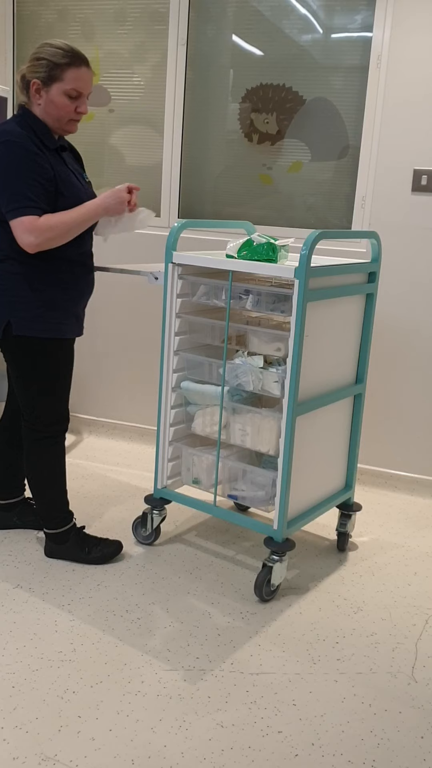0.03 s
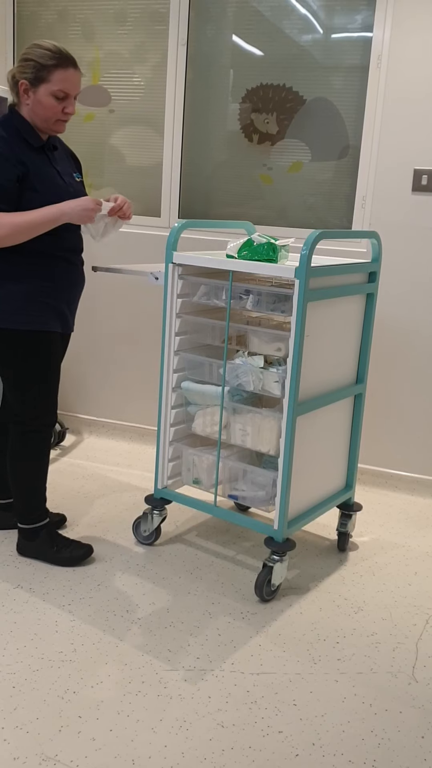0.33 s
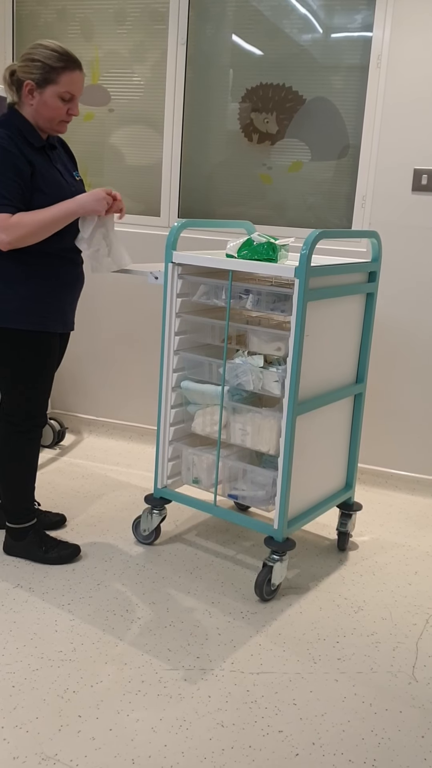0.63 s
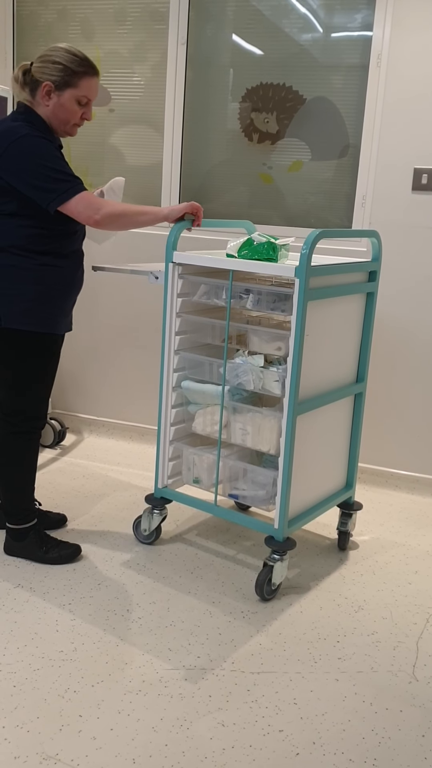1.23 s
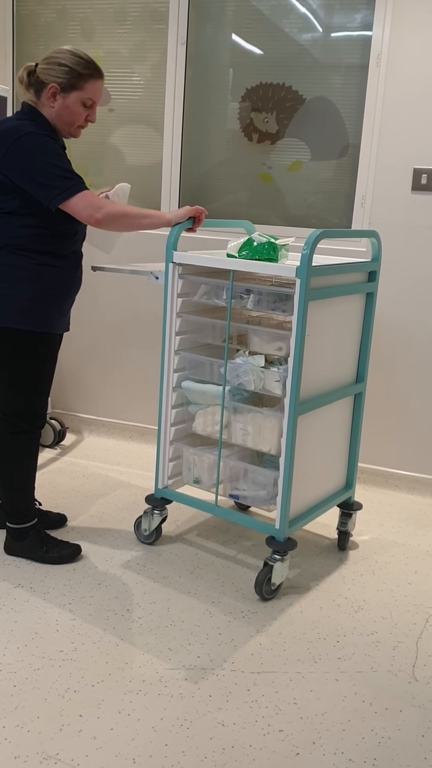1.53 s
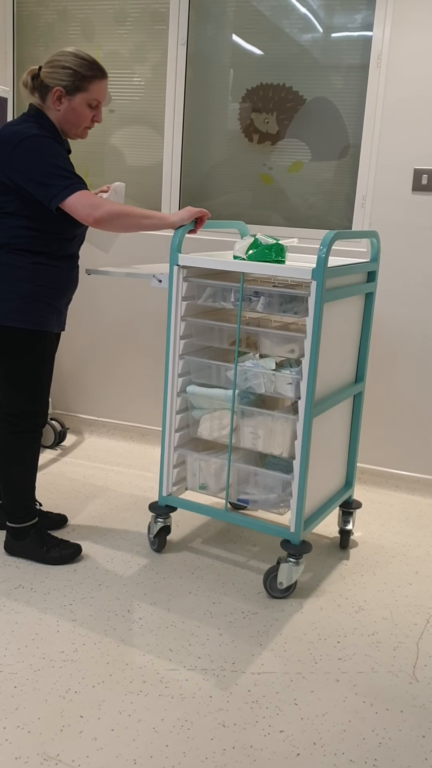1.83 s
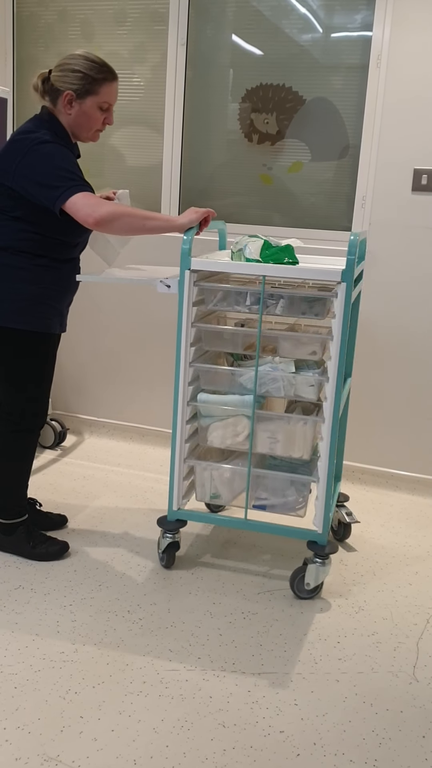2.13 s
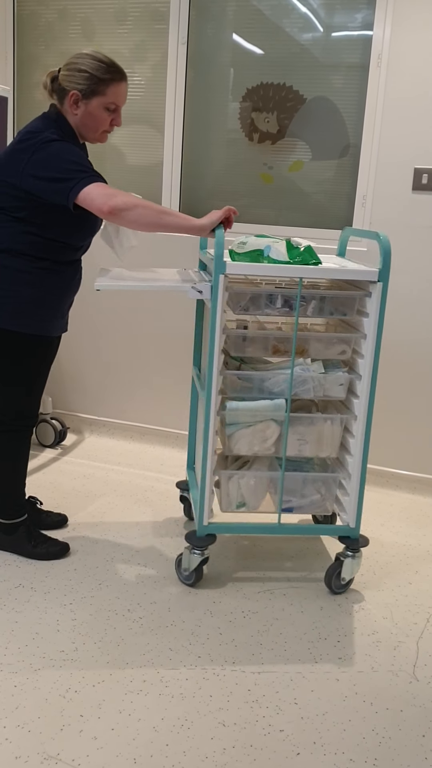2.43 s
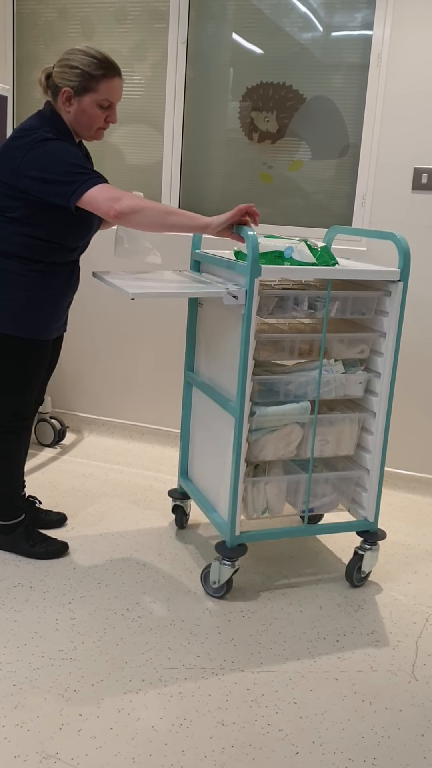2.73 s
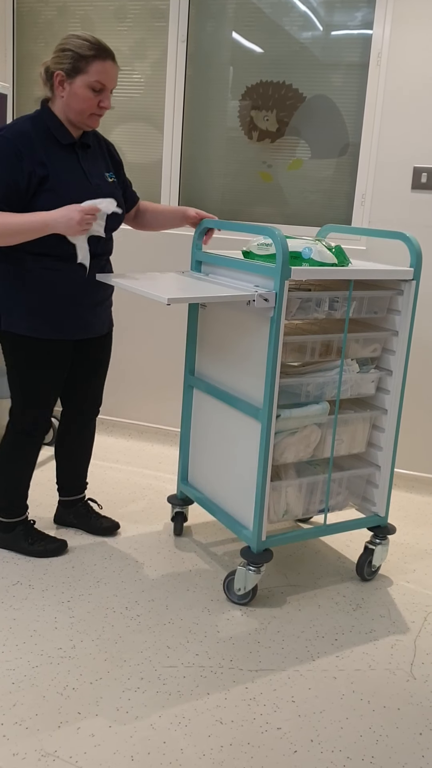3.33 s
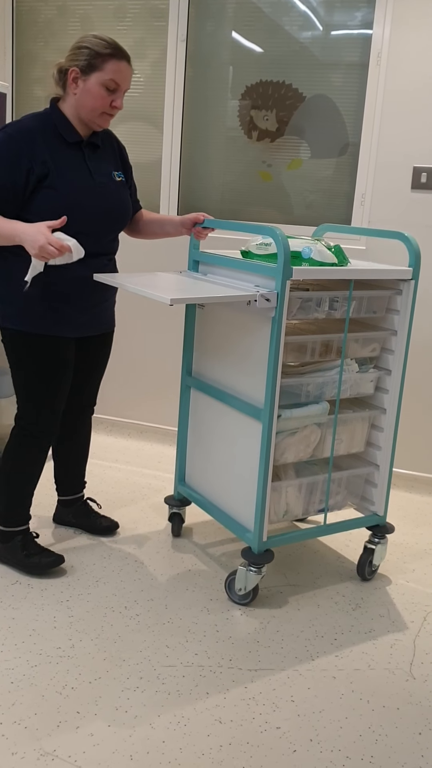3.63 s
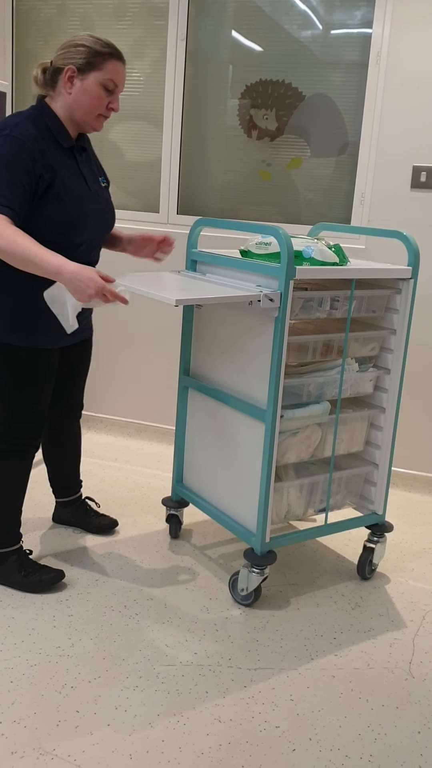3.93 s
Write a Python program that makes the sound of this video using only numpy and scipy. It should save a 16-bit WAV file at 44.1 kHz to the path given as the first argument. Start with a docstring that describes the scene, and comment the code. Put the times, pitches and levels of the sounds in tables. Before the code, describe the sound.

A wet wipe rustles softly, then a trolley swings round, its plastic drawers knocking and rattling.

```python
"""In a hard-walled clinical room, the ventilation rumbles and clothes rustle as a wet wipe is pulled
through the hands, its damp fibres hissing and ticking. A drawer trolley is then swung round on its
castors: the wheels roll and bump, the frame knocks and rings, plastic trays rattle and a loose metal
fitting jingles. The wipe is gathered up again and a rubber sole scuffs the floor.
The walls add a short echo to each movement."""
import sys
import numpy as np
from scipy import signal
from scipy.fft import rfft, irfft
from scipy.io import wavfile
from scipy.ndimage import uniform_filter1d

SR = 44100
rng = np.random.default_rng(int(sys.argv[2]) if len(sys.argv) > 2 else 0)


def generate_wav(signal):
    """Clip the signal to [-1, 1] and save it as 16-bit WAV at the path in sys.argv[1]."""
    frames = np.transpose(np.atleast_2d(signal))
    scaled = np.clip(frames, -1, 1) * 32767
    pcm = np.round(scaled).astype(np.int16)
    wavfile.write(sys.argv[1], SR, pcm)


N = 176400
T = np.arange(N) / SR

# Tone of the moving air: (frequency [Hz], relative level [dB])
AIR_TONE = [(15, -17), (27, 6), (40, -2), (66, 1), (82, -2.5), (115, -4), (200, -8), (235, -15.5),
            (300, -16), (400, -22.5), (580, -28.5), (760, -37.5), (920, -34), (1100, -56.5), (1500, -48.5),
            (2000, -60), (3000, -59), (6500, -62.5), (7500, -57.5), (9000, -66.5), (12000, -54.5),
            (16000, -65)]
# Notes that hum in the ducts: (frequency [Hz], half-width [Hz], level [dB])
DUCT_HUMS = [(60.1, 10, -41.5), (134.7, 10.3, -42.5), (171.3, 9.1, -51), (440, 7.5, -63),
             (570.6, 14, -66.5)]
# How alike the air sounds on the left and right: (frequency [Hz], likeness [0 to 1])
AIR_LIKENESS = [(60, 0.91), (130, 1), (290, 0.93), (640, 0.12), (1400, 0), (15000, 0.042)]
# Which side the air is louder on: (frequency [Hz], left minus right [dB])
AIR_LEAN = [(60, -0.5), (150, 2), (380, -3), (950, 0.5), (6000, 4.5), (15000, 0.5)]

# Loudness of the clothes: (time [s], level [dB])
RUSTLE_LEVEL = [(0, -60.5), (.6, -65.5), (.95, -62.5), (1.12, -75), (1.6, -85), (1.8, -64.5), (2.6, -95),
                (2.95, -61.5), (3.3, -64), (3.56, -61), (3.64, -81), (3.78, -74), (3.92, -64.5), (4, -65)]
# Tone of the clothes: (frequency [Hz], relative level [dB])
RUSTLE_TONE = [(300, -4.5), (1100, 8.5), (1900, -4), (3000, -11.5), (4200, 0), (5800, 1), (7400, 2),
               (8600, -5.5), (12000, -7), (16000, -22)]

# Pulls on the wipe:
# (start [s], rise [s], hold [s], fade [s], level [dB], treble tilt [dB per octave], bass cut [Hz])
WIPE_STROKES = [(0.088, 0.13, 0.049, 0.18, -48, 0, 350), (.22, .14, 0.086, 0.15, -46.5, 1.6, 500),
                (0.725, 0.041, 0.08, 0.033, -50.5, 3.5, 900), (0.787, 0.078, 0.016, 0.029, -54, -0.5, 700),
                (2.69, 0.014, 0.074, 0.026, -49.5, -1.8, 1600),
                (2.979, 0.0082, 0.031, 0.052, -56.5, 0.5, 1000),
                (3.039, 0.01, 0.011, 0.014, -49.5, -1, 1200), (3.071, 0.028, 0.053, 0.05, -55, 1, 600),
                (3.235, 0.0064, 0.01, 0.01, -49, -2.5, 2600), (3.3, 0.033, 0.053, 0.12, -63, 6.5, 2010)]
# Tone of the sliding wipe: (frequency [Hz], relative level [dB])
WIPE_TONE = [(300, -5), (550, 2), (850, 1), (1300, 0.5), (1750, -3.5), (2100, -1.5), (2800, -4),
             (4200, -2.5), (6500, -3), (7500, -4.5), (9000, -6), (12500, -4.5), (16000, -19.5)]
# Wet snaps of the wipe: (time [s], relative level [dB], pitch [Hz], width [octaves], decay [s])
WET_SNAPS = [(0.693, -55, 10700, 0.96, 0.0012), (.702, -55.5, 12470, 0.29, 0.0022),
             (2.968, -62, 7100, 0.14, .002), (3.309, -61, 11000, .4, .003), (3.389, -61, 14000, .13, 0.012),
             (3.418, -56, 13100, .13, 0.0089)]

# Loudness of the wheels; the faint first level also holds from the start: (time [s], level [dB])
WHEEL_LEVEL = [(1.6, -62.5), (1.72, -57), (1.95, -50.5), (2.03, -43), (2.17, -46), (2.3, -46), (2.38, -43),
               (2.5, -51), (2.62, -51.5), (2.85, -57.5), (2.94, -48), (3.15, -64), (3.3, -54), (3.7, -62.5),
               (4, -57.5)]
# Tone of the rolling wheels: (frequency [Hz], relative level [dB])
WHEEL_TONE = [(60, -24.5), (150, -13), (210, 15.5), (290, -0.5), (440, 0), (560, -0.5), (750, -5),
              (1100, -8), (1600, -14.5), (2500, -23.5), (5000, -35.5), (9000, -44)]
# Dull bumps of the wheels: (time [s], level [dB], pitch [Hz])
WHEEL_BUMPS = [(2.019, -36, 346), (2.27, -32, 220), (2.281, -37, 433)]

# Loudness of the rattling trays: (time [s], level [dB])
TRAY_LEVEL = [(1.66, -96), (1.71, -79), (1.82, -70), (1.85, -51), (1.93, -62.5), (1.99, -66), (2.06, -50),
              (2.12, -52), (2.18, -48.5), (2.24, -48), (2.3, -55), (2.34, -54), (2.48, -49), (2.6, -64.5),
              (2.9, -61), (3.3, -77)]
# Tone of the frame and trays: (frequency [Hz], relative level [dB])
TROLLEY_TONE = [(200, -0.5), (330, 8.5), (540, 2.5), (720, -1), (1100, 1), (1550, -3.5), (2100, -2.5),
                (3000, -6.5), (4500, -9), (7000, -13.5), (9000, -20), (12500, -22.5), (16000, -32)]
# Knocks of castors and drawers:
# (time [s], level [dB], treble tilt [dB per octave], ringing compared with the knock [dB])
TROLLEY_KNOCKS = [(1.6961, -56.5, -3, -4), (1.831, -55, 3, -14), (1.8371, -46, 0.5, 3.5),
                  (1.875, -46, -2, -7), (2.0038, -43.5, 4.5, -26), (2.0848, -38, 2.5, -19),
                  (2.118, -40.5, -2.5, -6), (2.165, -42.5, -2.5, -27), (2.189, -37.5, -.3, -8.5),
                  (2.2373, -35, -.5, -17), (2.2833, -34.5, 0.5, -11), (2.306, -42.5, -6, -12)]
# Ringing notes of the frame: (frequency [Hz], relative level [dB], time to fade by 60 dB [s])
FRAME_NOTES = [(960, -14, .08), (1003, 5, .12), (1096, -6, 0.082), (1220, 2, 0.086), (1830, -18, .07),
               (2032, 2, 0.049), (2110, -1, .07), (2480, -2, 0.049), (3900, -14, 0.064)]

# Hits of the metal fitting: (time [s], level [dB])
METAL_HITS = [(2.3995, -42), (2.414, -54), (2.4444, -48.5), (2.4788, -44), (2.497, -64)]
# Tone of each hit: (frequency [Hz], relative level [dB])
METAL_HIT_TONE = [(500, -3), (2000, -16), (4800, 4.5), (7500, -7), (9000, -5.5), (12000, -4.5),
                  (16000, -19)]
# Ringing notes of the fitting: (frequency [Hz], relative level [dB], time to fade by 60 dB [s])
METAL_NOTES = [(3820, -5, .12), (4300, -5, .1), (4170, 6, 0.15), (4460, -7, 0.087), (4500, -1, 0.15),
               (4700, -15, .12), (4926, -3, .12), (5200, -3, .11), (5430, -2, .13), (5340, -1, .16),
               (6360, 6, .1)]

# Scuffs of the shoe: (start [s], rise [s], hold [s], fade [s], level [dB])
SHOE_SCUFFS = [(3.402, .018, 0.011, 0.023, -45.5), (3.437, 0.015, 0.011, .01, -44),
               (3.484, 0.0084, 0.045, 0.046, -54)]
# Tone of the rubber sole: (frequency [Hz], relative level [dB])
SOLE_TONE = [(150, -7), (380, -6), (510, 5.5), (590, 1), (700, -6), (800, -4.5), (1010, 2), (1180, -10),
             (1350, -2), (1600, -25), (3000, -26), (8000, -34)]

# How long the room echoes: (frequency [Hz], time to fade by 60 dB [s])
ECHO_TIMES = [(100, 0.28), (500, 0.58), (1500, 0.59), (4000, 0.52), (8000, 0.38), (15000, .4)]
# Tone of the microphones: (frequency [Hz], gain [dB])
MIC_TONE = [(6300, -1.5), (7400, 2), (7900, 0.5), (8300, -5), (9300, -5), (12000, -4.5), (16000, 2.5)]


def amp(db):
    """Turns decibels into a number to multiply by."""
    return 10 ** (np.asarray(db) / 20)


def unit(x):
    """Scales a signal to an average power of one."""
    return x / np.sqrt(np.mean(x ** 2) + 1e-20)


def unit_hit(x):
    """Scales a short sound to the energy of 10 ms at full level."""
    return x * np.sqrt(.01 * SR / (np.sum(x ** 2) + 1e-20))


def look_up(points, hz):
    """Reads between the rows of a frequency table, with octaves evenly spaced."""
    row_hz, value = np.transpose(points)
    return np.interp(np.log(hz + 1), np.log(row_hz + 1), value)


def loudness(points):
    """Joins (time, level) points into a volume curve."""
    return amp(np.interp(T, *np.transpose(points)))


def add(mix, start, sound):
    """Mixes a sound in at a start time in seconds."""
    part = mix[max(round(start * SR), 0):][:len(sound)]
    part += sound[:len(part)]


def colour(x, tone, tilt=0, low_hz=100):
    """Gives a sound a tone, tilts it above low_hz and softens the bass below."""
    hz = np.fft.rfftfreq(4096, 1 / SR) + 1
    octaves = np.log2(np.maximum(hz, low_hz) / low_hz)
    gain = amp(look_up(tone, hz) + tilt * octaves) / np.sqrt(1 + (low_hz / hz) ** 4)
    # These steps make the filter ring only after a click, never before it.
    cepstrum = irfft(np.log(np.maximum(gain / gain.max(), 1e-5)))
    cepstrum[1:2048] *= 2
    cepstrum[2049:] = 0
    response = irfft(np.exp(rfft(cepstrum)))[:2048]
    return signal.fftconvolve(x, response)[:len(x)]


def grains(per_s, spread_db):
    """Random clicks of uneven size, the raw sound of rubbing and rattling."""
    size = amp(spread_db * np.minimum(rng.exponential(1, N), 4))
    return size * rng.standard_normal(N) * (rng.random(N) < per_s / SR)


def swell(start, rise, hold, fade):
    """A volume curve that rises, holds and fades."""
    rising = (T - start) / max(rise, 1e-3)
    fading = 1 - (T - start - rise - hold) / max(fade, 1e-3)
    return np.clip(np.minimum(rising, fading), 0, 1)


def ring(hits, notes):
    """Hits set off fading notes that carry as much energy as the hits."""
    t = T[:SR // 2]
    tones = sum(amp(db - 60 * t / fade_s) * np.sin(2 * np.pi * hz * t) for hz, db, fade_s in notes)
    return unit(signal.fftconvolve(hits, tones)[:N]) * np.std(hits)


def strike(hit_s=0.0034, chatter_s=0.013, chatter_db=-11.5):
    """A sharp hit followed by fine chatter, evened out from bass to treble."""
    t = T[:SR // 5]
    hit, chatter = rng.standard_normal((2, len(t)))
    chatter = amp(chatter_db) * unit(chatter ** 3) * np.exp(-t / chatter_s)
    spectrum = rfft(hit * np.exp(-t / hit_s) + chatter)
    smooth_power = uniform_filter1d(abs(spectrum) ** 2, size=25)
    return irfft(spectrum / np.sqrt(smooth_power + 1e-12))[:len(t) // 2]


def ventilation(air_db=-37.5, low_hz=34.5):
    """Air rumbles steadily and hums in the ducts, its bass almost the same on both sides."""
    hz = np.fft.rfftfreq(N, 1 / SR)
    left, other = rfft(rng.standard_normal((2, N)))
    power = (amp(air_db) * unit(amp(look_up(AIR_TONE, hz)))) ** 2
    for centre, width, db in DUCT_HUMS:
        peak = 1 / (1 + ((hz - centre) / width) ** 2)
        power += (amp(db) * unit(peak)) ** 2
    power *= hz ** 8 / (hz ** 8 + low_hz ** 8)  # cuts the deepest bass
    likeness = np.clip(look_up(AIR_LIKENESS, hz), -1, 1)
    right = likeness * left + np.sqrt(1 - likeness ** 2) * other
    lean = amp(look_up(AIR_LEAN, hz) / 2)
    return irfft(np.sqrt(power) * np.array([left * lean, right / lean]), N)


def clothes():
    """Fabric rubs softly as the body moves."""
    rubbing = grains(per_s=5000, spread_db=4.4)
    return loudness(RUSTLE_LEVEL) * unit(colour(rubbing, RUSTLE_TONE, low_hz=350))


def wipe():
    """Damp fibres slip through the fingers, so each pull hisses."""
    fibres = grains(per_s=7000, spread_db=2.5)
    return sum(amp(db) * swell(*timing) * unit(colour(fibres, WIPE_TONE, tilt, low_hz))
               for *timing, db, tilt, low_hz in WIPE_STROKES)


def wet_snaps():
    """The wet wipe snaps in tiny bursts of high hiss."""
    out, t = np.zeros(N), T[:2048]
    hz = np.fft.rfftfreq(len(t), 1 / SR) + 1
    for start, db, centre_hz, octaves, decay_s in WET_SNAPS:
        band = np.exp(-.5 * (np.log2(hz / centre_hz) / octaves) ** 2)
        hiss = irfft(rfft(rng.standard_normal(len(t))) * band)
        add(out, start, amp(db) * unit_hit(hiss * np.exp(-t / decay_s)))
    return out


def castors(bump_fade_s=0.034):
    """Wheels run over the fine grain of the floor and bump as they swivel."""
    floor = grains(per_s=1500, spread_db=1.8)
    out = loudness(WHEEL_LEVEL) * unit(colour(floor, WHEEL_TONE))
    t = T[:SR // 5]
    for start, db, hz in WHEEL_BUMPS:
        bump = np.sin(2 * np.pi * hz * t) * amp(-60 * t / bump_fade_s)
        add(out, start, amp(db) * unit_hit(bump))
    return out


def trays_and_frame():
    """Loose trays rattle, while knocks from castors and drawers make the frame ring."""
    rattle = grains(per_s=540, spread_db=5.5)
    out = loudness(TRAY_LEVEL) * unit(colour(rattle, TROLLEY_TONE, tilt=0.35, low_hz=596))
    frame_hits = np.zeros(N)
    for start, db, tilt, ring_db in TROLLEY_KNOCKS:
        knock = amp(db) * unit_hit(colour(strike(), TROLLEY_TONE, tilt, low_hz=377))
        add(out, start, knock)
        add(frame_hits, start, amp(ring_db) * knock)
    return out + ring(frame_hits, FRAME_NOTES)


def metal_fitting(ring_db=-5):
    """A loose metal part is struck and rings as the trolley swings round."""
    hits = np.zeros(N)
    for start, db in METAL_HITS:
        add(hits, start, amp(db) * unit_hit(colour(strike(), METAL_HIT_TONE, low_hz=600)))
    return hits + amp(ring_db) * ring(hits, METAL_NOTES)


def shoe():
    """A rubber sole stutters over the floor."""
    slips = unit(colour(grains(per_s=2500, spread_db=2), SOLE_TONE, low_hz=200))
    return slips * sum(amp(db) * swell(*timing) for *timing, db in SHOE_SCUFFS)


def echoes(direct_db=-9.5, early_db=-6.5, build_s=0.0038, shared_bass_hz=540):
    """A click reaches two microphones directly, then as a few early echoes and a fading wash."""
    hz, t, bands = signal.stft(rng.choice([-1., 1.], (2, SR)), SR, nperseg=256)
    likeness = np.exp(-(hz[:, None] / shared_bass_hz) ** 2)  # both sides hear the same bass
    bands[1] = likeness * bands[0] + np.sqrt(1 - likeness ** 2) * bands[1]
    fade = amp(-60 * t / look_up(ECHO_TIMES, hz)[:, None])
    response = signal.istft(bands * fade, SR, nperseg=256)[1][:, :SR]
    response *= 1 - np.exp(-T[:SR] / build_s)
    response /= np.linalg.norm(response[0])
    for side, lag in zip(response, (0, 3)):  # the right side hears it 3 samples later
        side[lag] += amp(direct_db)
        arrivals = rng.integers(90, 900, size=12)
        side[arrivals] += amp(early_db) * rng.choice([-1, 1], size=12) / np.sqrt(12)
    return response / np.linalg.norm(response[0])


def room(x, left_db, echo_sets=5, move_s=.045):
    """A moving source fades from one set of echoes to the next; left_db favours the left side."""
    out = 0
    for k in range(echo_sets):
        nearness = np.clip(1 - abs((T / move_s - k) % echo_sets - 1), 0, 1)
        share = x * np.sin(np.pi / 2 * nearness)
        out = out + signal.fftconvolve(share[None], echoes(), axes=1)[:, :N]
    return out * amp([[left_db / 2], [-left_db / 2]])


def scene():
    """Wipe and clothes sit a little to the left, trolley and shoe near the middle."""
    snaps = wet_snaps()
    person = room(wipe() + clothes() + amp(-5) * snaps, left_db=1.4)
    person += amp(-4) * snaps  # part of each snap arrives with no echo
    trolley_and_shoe = room(castors() + trays_and_frame() + metal_fitting() + shoe(), left_db=0.55)
    return ventilation() + person + trolley_and_shoe


def record(dry, top_hz=15850):
    """The microphones colour the sound, and the highest treble is cut off."""
    hz = np.linspace(0, SR / 2, 1025)
    mic = signal.firwin2(511, hz, amp(look_up(MIC_TONE, hz)), fs=SR)
    treble_cut = signal.firwin(511, top_hz, window=("kaiser", 9), fs=SR)
    response = np.convolve(mic, treble_cut)
    padded = np.pad(dry, ((0, 0), (len(response) // 2,) * 2), "reflect", reflect_type="odd")
    return signal.oaconvolve(padded, response[None], "valid")


dry = scene()
out = record(dry)
generate_wav(out)
```